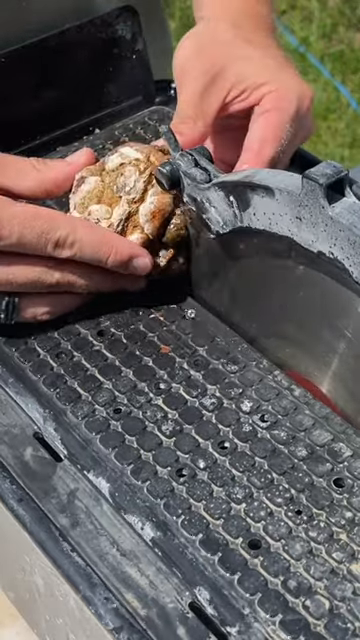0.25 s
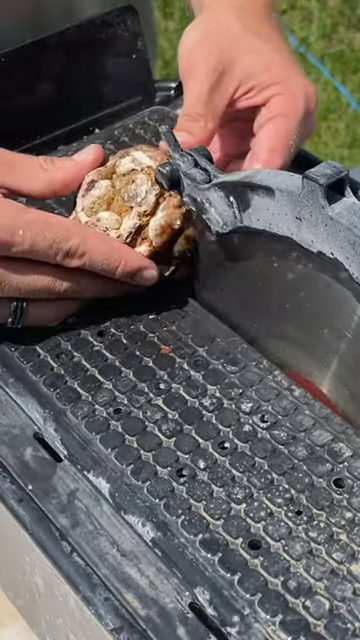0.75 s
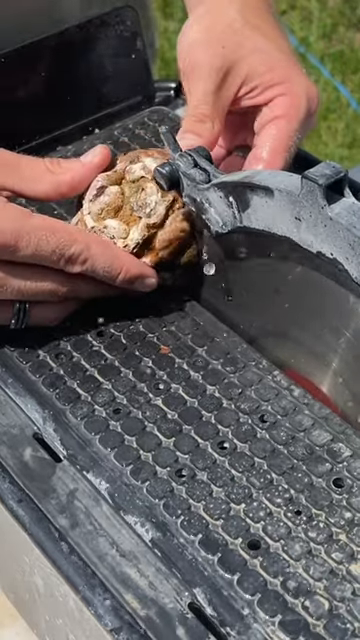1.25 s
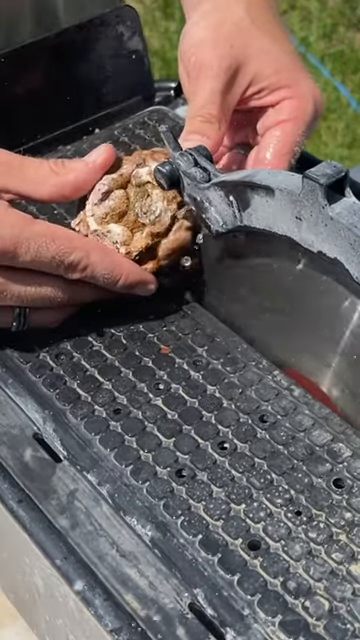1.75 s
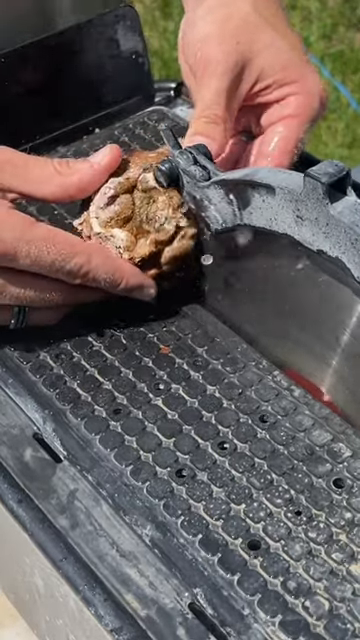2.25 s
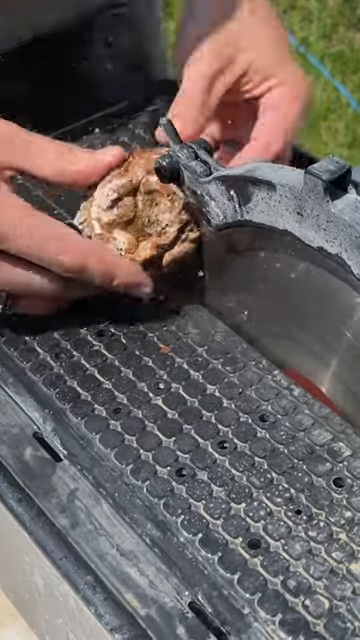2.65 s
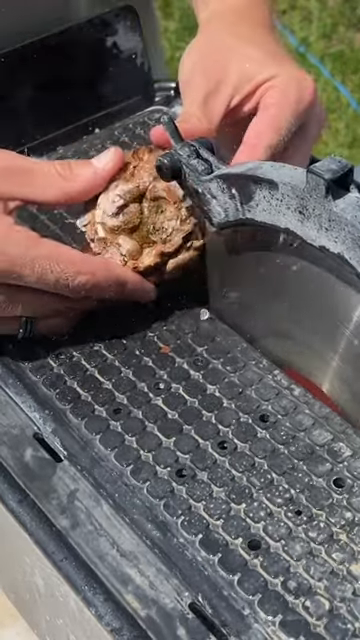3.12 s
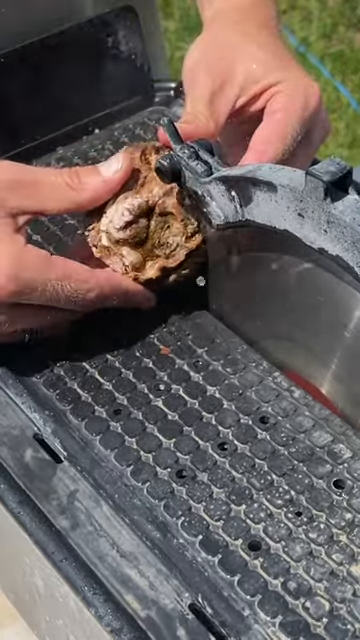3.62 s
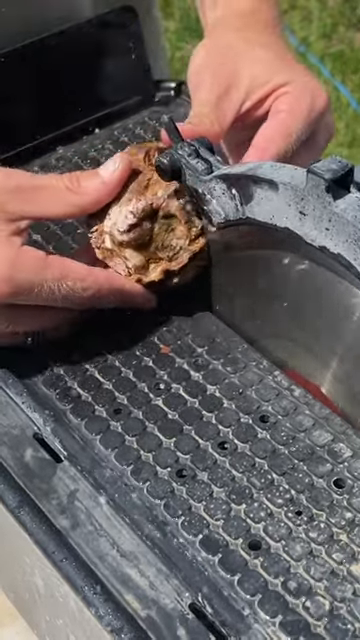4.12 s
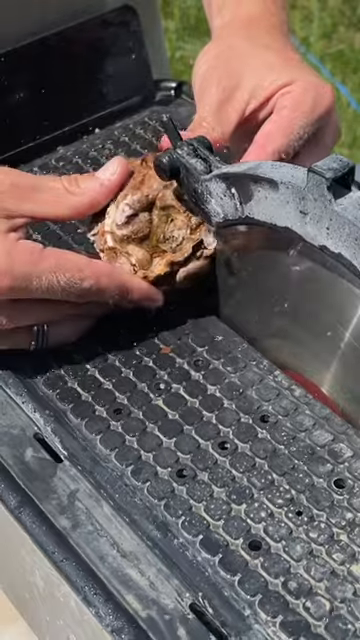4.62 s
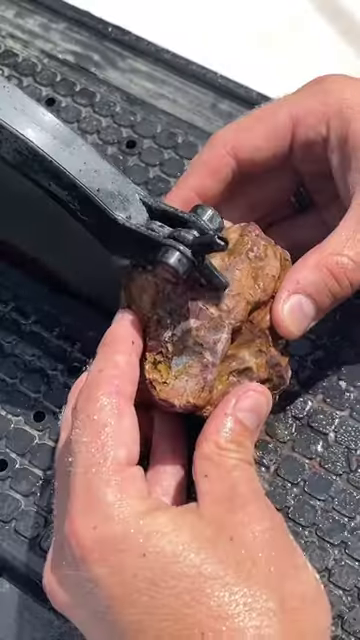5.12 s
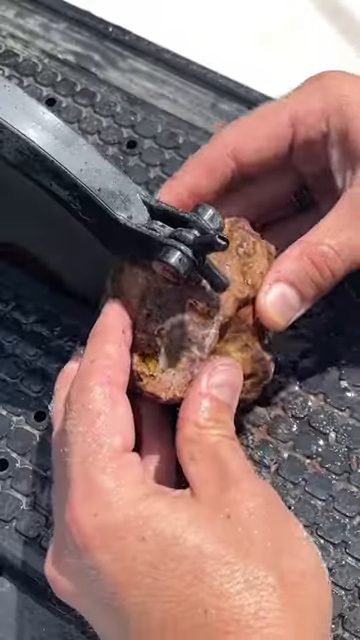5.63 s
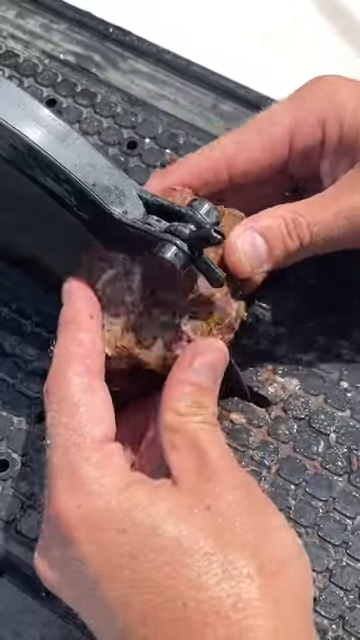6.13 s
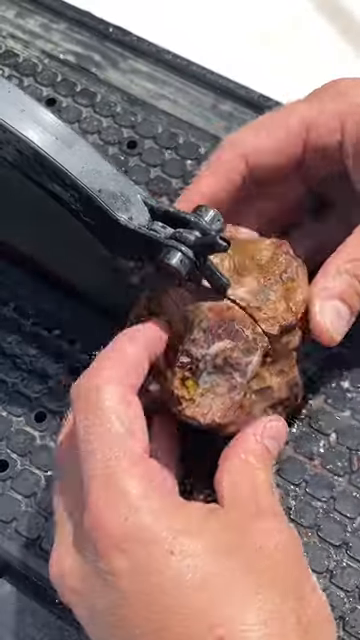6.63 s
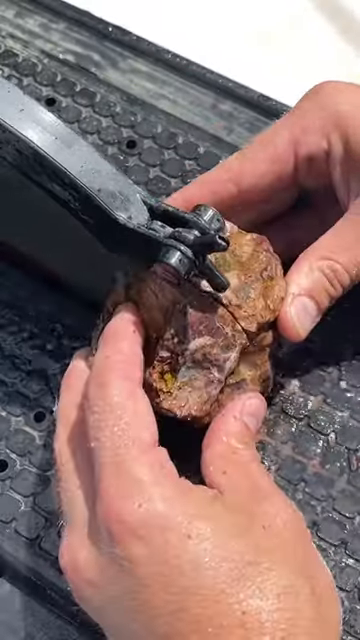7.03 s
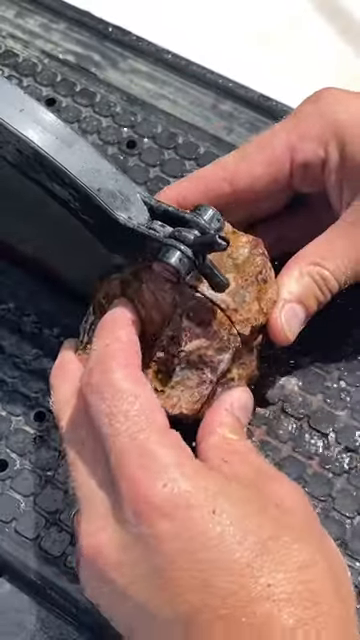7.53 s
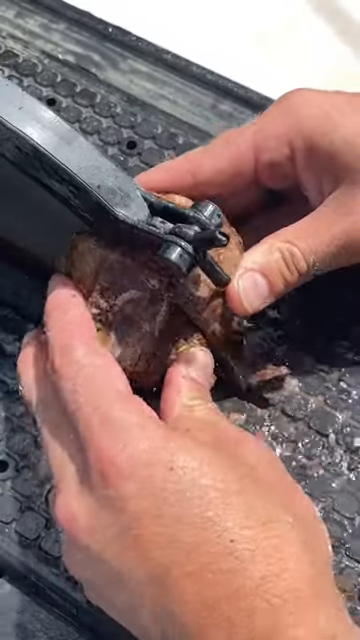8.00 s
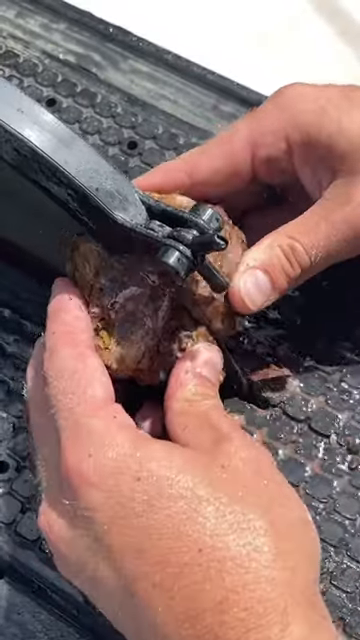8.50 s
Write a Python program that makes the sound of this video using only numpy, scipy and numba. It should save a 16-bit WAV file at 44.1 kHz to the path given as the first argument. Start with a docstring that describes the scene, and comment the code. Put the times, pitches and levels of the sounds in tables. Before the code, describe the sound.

Buzzing, gritty blade grind on rock with water-spray hiss and wind thumps, shifting in tone midway, ending in a sudden piercing screech with cracking chips.

```python
"""A wet tile saw cuts a hand-held stone outdoors, picked up from two places in turn, then very close.
The rim meets the stone the same way each turn, so the grind is a comb of the turn rate; fresh grit
replaces part of that pattern whenever the stone is shifted. The close cut is a loud, throbbing scream
of grit-driven blade resonances with cracking chips. Fan and spray hiss as filtered noise, with a thin
motor tone at the first place; wind buffets the microphone as lumpy low noise and single pushes."""
import sys
import numpy as np
from scipy import signal
from scipy.fft import rfft, irfft
from scipy.io import wavfile
from scipy.ndimage import uniform_filter1d, map_coordinates
from numba import njit

SR = 44100
rng = np.random.default_rng(int(sys.argv[2]) if len(sys.argv) > 2 else 0)


def generate_wav(signal):
    """Clip the signal to [-1, 1] and save it as 16-bit WAV at the path in sys.argv[1]."""
    frames = np.transpose(np.atleast_2d(signal))
    scaled = np.clip(frames, -1, 1) * 32767
    pcm = np.round(scaled).astype(np.int16)
    wavfile.write(sys.argv[1], SR, pcm)


def voltage_ratio(level):
    """Linear amplitude factor for a level in decibels (scalar or array-like)."""
    return 10 ** (np.asarray(level, float) / 20)


N = 386316

MOVE_S, CLOSE_S = 4.84, 8.29   # the second place begins; the close cut begins
# how restlessly the stone sits on the rim: t/s, scale for the ring, scale for the grind
RESTLESSNESS = [(0.0, .8, .9), (.35, .35, 1), (1.25, .35, 1), (1.4, .35, .7), (2.2, .35, .7), (2.4, .8, .9),
                (2.68, .8, .9), (2.72, .3, .5), (2.84, .3, .5), (2.9, .8, .9), (3.2, .6, .55),
                (4.05, .6, .45), (4.2, .9, .6), (4.83, 1, .5), (5.1, 1, .8), (6.2, 1.1, .9), (6.3, .5, .6),
                (6.8, .5, .6), (7.6, .5, .7), (7.7, 1, 1), (8.28, 1, 1)]


def in_time(rows):
    """Table columns as curves, one value a sample."""
    s, *columns = np.transpose(rows)
    return [np.interp(np.arange(N) / SR, s, c) for c in columns]


def spells(rows, rise_s, fall_s):
    """Rows of (start, length, size) as one curve of flat-topped humps; the edges straddle start and end."""
    t = np.arange(0, N + 32, 32) / SR
    out = np.zeros(len(t))
    for start, length, size in rows:
        rise = np.clip((t - start) / rise_s + .5, 0, 1)
        fall = np.clip((start + length - t) / fall_s + .5, 0, 1)
        out += size * rise * fall
    return np.interp(np.arange(N) / SR, t, out)


def rms_one(x):
    """Scale to unit rms."""
    return x / np.sqrt(np.mean(x ** 2) + 1e-20)


def coloured(x, points):
    """Filter by a (Hz, dB) spectrum, joined up along log frequency."""
    hz = np.maximum(np.fft.rfftfreq(N, 1 / SR), 1)
    hz_at, db = np.transpose(points)
    return irfft(rfft(x) * voltage_ratio(np.interp(np.log(hz), np.log(hz_at), db)), N)


def band(x, low_hz, high_hz):
    """Steep band-pass."""
    return signal.sosfilt(signal.butter(4, [low_hz, high_hz], "band", fs=SR, output="sos"), x)


def evened(x, over_s):
    """Divide out the slow level."""
    return x / np.sqrt(uniform_filter1d(x ** 2, int(over_s * SR)) + 1e-20)


def drift(shape, rate):
    """Slow chance along the last axis, rate in cycles per step; rms 1."""
    r = np.exp(-2 * np.pi * rate)
    noise = rng.standard_normal((shape[0], shape[1] + 500))
    return rms_one(signal.lfilter([1], [1, -2 * r, r * r], noise)[:, 500:])


def blend(share, pattern, grit):
    """Mix two sources by power share."""
    return np.sqrt(share) * pattern + np.sqrt(1 - share) * grit


def resonance(x, hz, width_hz):
    """Two-pole resonance, gain 1 on top."""
    r = np.exp(-np.pi * max(width_hz, 5) / SR)
    return signal.lfilter([(1 - r * r) / 2, 0, (r * r - 1) / 2], [1, -2 * r * np.cos(2 * np.pi * hz / SR), r * r], x)


@njit
def moving_resonance(x, hz, r, sr):
    """Two-pole resonance whose centre follows a curve; r is the pole radius."""
    y = np.zeros(len(x))
    for i in range(2, len(x)):
        driven = (1 - r * r) / 2 * (x[i] - x[i - 2])
        y[i] = driven + 2 * r * np.cos(2 * np.pi * hz[i] / sr) * y[i - 1] - r * r * y[i - 2]
    return y


def motor():
    """Fan and spray as steady filtered noise throughout, and a thin steady sine at the first place."""
    # motor tone: f/Hz, level/dB rms
    tone_rows = [(1034, -69.5)]
    # spectrum of fan and spray: f/Hz, relative level/dB per Hz
    fan_colour = [(60, -13), (150, 9.5), (400, 4), (750, 10), (1000, 11), (2000, 11), (3300, -3),
                  (8000, 14), (15600, -39)]
    t = np.arange(N) / SR
    tone = sum(voltage_ratio(db) * np.sqrt(2) * np.sin(2 * np.pi * hz * t) for hz, db in tone_rows)
    fan = rms_one(coloured(rng.standard_normal(N), fan_colour))
    return voltage_ratio(-66) * fan + tone * (t < MOVE_S)


def wind():
    """Lumpy low pressure noise on the microphone port; strong gusts reach higher."""
    # wind strength: t/s, level/dB
    strength = [(0.0, -62), (0.8, -48), (1.1, -56), (1.32, -42.5), (2.0, -37.5), (2.7, -47), (2.95, -50),
                (3.1, -77), (3.5, -55), (3.76, -63), (3.9, -44.5), (4.55, -46), (4.83, -53.5), (4.88, -73),
                (5.15, -71), (5.5, -56), (5.65, -47), (5.86, -64.5), (6.1, -55.5), (6.44, -63), (6.56, -42),
                (6.9, -48.5), (7.05, -61), (7.3, -71), (7.9, -69), (8.2, -50.5), (8.32, -58), (8.76, -44)]
    # wind spectrum: f/Hz, relative level/dB per Hz
    wind_colour = [(20, 2.5), (40, -7.5), (80, -12.5), (110, -16.5), (160, -16.5), (320, -39), (700, -49.5),
                   (1500, -50)]
    # single buffets on the port: t/s, size/dB over the wind, before the scaling and offset below
    buffets = [(.02, 12), (.41, 4), (.56, 4), (.86, 14), (1.315, 9), (1.36, 8), (1.51, 8), (1.55, -2),
               (1.765, 4), (1.79, 5), (1.825, 6), (2.043, 9.5), (2.27, 8), (2.48, 7), (2.545, 9),
               (2.665, 14), (2.73, 15.5), (4.051, 6.5), (4.22, 8), (4.53, 11), (4.75, 4), (4.82, 11),
               (5.03, 16), (5.561, 14), (6.59, 3), (7.64, 14)]
    buffet_s, push_s = 0.015, 0.0057   # Gaussian spreads
    t = np.arange(N) / SR
    steps = N // 100 + 1
    lumps = np.interp(np.arange(N) / 100, np.arange(steps), voltage_ratio(1.65 * drift((1, steps), 0.031)[0]))
    colour = [(4.3, -62)] + wind_colour + [(4000, -81)]
    gusts = evened(coloured(rng.standard_normal(N) * lumps, colour), 0.28)
    steady_db = in_time(strength)[0]
    wind_db = steady_db + sum(0.74 * db * np.exp(-.5 * ((t - s) / buffet_s) ** 2) for s, db in buffets)
    # each buffet also pushes the diaphragm once: in, then out
    pushes = sum(voltage_ratio(db) * (t - s) / push_s * np.exp(-.5 * ((t - s) / push_s) ** 2) for s, db in buffets)
    # the upper part of the gusts grows faster than the wind itself
    upper = voltage_ratio(0.062 * (wind_db + 9.0)) * band(gusts, 154.0, 2400)
    return voltage_ratio(steady_db + 2.5) * pushes + voltage_ratio(wind_db) * (0.83 * gusts + upper)


def close_cut():
    """Grit drives the blade resonances; every bite swells the scream and knocks the table."""
    # one throb per bite of the rim: t/s, scream level/dB rms, knock level/dB
    bites = np.array([(8.305, -31.5, -60), (8.3192, -33, -66), (8.3513, -25, -68), (8.381, -26, -63),
                      (8.413, -25, -38), (8.434, -40, -36), (8.451, -24.5, -45), (8.487, -25.5, -40),
                      (8.5223, -28, -35.5), (8.5538, -26.5, -30.5), (8.5856, -26, -53), (8.6, -28, -46),
                      (8.619, -25, -39), (8.633, -28, -53), (8.66, -29.5, -40), (8.6976, -25.5, -35),
                      (8.732, -26, -42)])
    # between bites: t/s, scream level/dB, upper over lower scream/dB, hiss level/dB, rumble level/dB,
    # lower scream f/Hz, upper scream f/Hz
    between = [(8.3, -30.5, -5, -44.5, -39, 4260, 5300), (8.35, -32, 1.5, -40, -38.5, 4270, 5300),
               (8.42, -37, -4, -44.5, -38.5, 4150, 5550), (8.47, -38.5, -7, -44, -40, 3460, 5450),
               (8.54, -37, 1, -40, -41, 3560, 5600), (8.58, -34.5, -5, -43, -45, 4000, 5700),
               (8.62, -31, -1.5, -42.5, -41.5, 4050, 5700), (8.69, -30.5, 1.5, -38, -42, 4320, 5870),
               (8.76, -28.5, 4.5, -35.5, -37.5, 4400, 5900)]
    # spectrum of the close grit: f/Hz, relative level/dB per Hz
    grit_colour = [(59, -47), (100, -17), (220, -7), (320, -20.5), (531, -16), (944, -11.5), (1710, -15),
                   (2870, 0), (3730, 13.5), (4070, 7), (5770, 4), (6400, -17), (8320, -39), (14100, -120)]
    # spectrum of the close hiss: f/Hz, relative level/dB per Hz
    hiss_colour = [(3760, -26), (6400, -9), (6640, -6), (8500, -5), (9400, -9), (11800, -10.5), (12800, -2),
                   (14300, -7), (15600, 0)]
    # blade resonances: f/Hz, width/Hz, level/dB relative to each other
    resonances = [(2340, 120, -9), (2920, 170, 5.5), (3330, 61, 1.5), (4050, 100, 5.5), (4430, 96, 2.5),
                  (5300, 83, -3)]
    # chips cracking off the stone: t/s, level/dB relative to each other, treble within the crack/dB
    chip_rows = [(8.4487, -17, -9), (8.521, -15.5, -3), (8.555, -17, -6), (8.5859, -15, -6),
                 (8.6007, -20, -8), (8.6167, -16, -8), (8.6264, -14, -12), (8.6365, -18, -14),
                 (8.6544, -26, -11), (8.6986, -19, -6), (8.732, -19, -8), (8.7457, -15, -8)]
    chip_s = 0.0019   # decay time constant
    t = np.arange(N) / SR
    scream_db, upper_db, hiss_db, rumble_db, centre_hz, upper_hz = in_time(between)

    since = t - bites[:, :1] - .006   # each throb peaks 6 ms after its time in the table
    swell = np.exp(-.5 * (since / np.where(since < 0, .0075, .007)) ** 2)
    bite = np.sqrt(voltage_ratio(2 * bites[:, 1]) @ swell ** 2)
    knock_rise = np.clip((since + 0.0034) / 0.0057, 0, 1)
    knock = voltage_ratio(bites[:, 2]) @ (knock_rise * np.exp(-(since + 0.0055).clip(0) / 0.022))

    # uneven grain sizes roughen the noise
    grains = rng.standard_normal(N) * voltage_ratio(3.5 * np.minimum(rng.exponential(1, N), 5))
    grit = rms_one(coloured(grains, grit_colour))
    flutter = drift((len(resonances), int(200 * N / SR) + 2), 0.069)   # 200 steps a second
    rung = grit.copy()
    for (hz, width_hz, db), f in zip(resonances, flutter):
        flutter_db = 4.6 * np.interp(t * 200, np.arange(len(f)), f)
        rung += voltage_ratio(db + 10.5 + flutter_db) * resonance(grains, hz, width_hz)

    lower = evened(band(rung + 2.4 * moving_resonance(rung, centre_hz, 0.98, SR), 1980, 5000), .06)
    upper = grains + 4.5 * moving_resonance(grains, upper_hz, .984, SR)
    upper = upper + 3.5 * moving_resonance(grains, upper_hz - 330, .985, SR)
    tilt = voltage_ratio(upper_db)
    scream = (lower + tilt * evened(band(upper, 4700, 6400), .06)) / np.sqrt(1 + tilt ** 2)
    scream = np.hypot(voltage_ratio(scream_db), bite) * scream

    hiss = rms_one(band(coloured(grains, hiss_colour), 6350, 16600))
    hiss = voltage_ratio(hiss_db) * (1 + 1.1 * swell.sum(axis=0)) * hiss
    rumble = voltage_ratio(rumble_db) * rms_one(band(grit, 96, 2040))
    knocks = knock * rms_one(band(grains, 130, 425) + 0.54 * band(grains, 603, 1070))
    dull, bright = rms_one(band(grains, 2870, 5600)), rms_one(band(grains, 6300, 14000))
    chips = np.zeros(N)
    for s, db, treble_db in chip_rows:
        decay = np.exp(-(t - s).clip(0) / chip_s) * (t > s)
        chips += voltage_ratio(db - 7.5) * decay * (dull + voltage_ratio(treble_db) * bright)
    return (scream + hiss + rumble + knocks + chips) * np.clip((t - CLOSE_S) / 0.011, 0, 1)


def rim_pattern(turns, favoured, ring_boost_db, wander_db, patch_db, slip):
    """One waveform per turn, its 64 overtones wandering in strength and phase as the kerf wears."""
    # overtones that sing out or fade, one list for each singing multiple: start t/s, length/s, change/dB
    sing_lists = [
        [(0, 0.35, -4.5), (1.6, 0.43, -5), (2.8, 0.19, -4), (3.6, 0.47, -4), (4.2, .2, 3.5), (4.65, .15, 2),
         (4.86, 0.69, -1.5), (5.65, 0.097, 5), (5.8, .2, -10), (6.8, .2, -2), (7.2, 0.19, -7), (7.4, 0.17, 3)],
        [(0, 0.22, -7), (.22, 0.15, 2.5), (1.25, 1.15, 5), (2.42, 0.24, -11), (2.68, 0.21, 5), (3.2, 0.22, -4),
         (4.45, 0.074, 0), (4.54, 0.044, -6), (4.6, 0.072, 6), (4.69, .04, -8), (5.18, 0.053, 10),
         (5.25, .04, -10), (5.36, .02, -6), (5.42, .12, -11), (5.8, 0.039, 4), (6.1, 0.53, 5)],
        [(0, 0.44, 4.5), (.6, 0.45, -3), (1.25, 0.11, 5), (1.56, 0.082, 11), (2.0, 0.33, 3.5), (2.44, 0.11, 4),
         (2.86, .25, 0.5), (3.8, 0.24, 1.5), (4.03, .14, 5), (4.25, 0.165, -9), (4.55, .05, -6),
         (4.61, 0.05, 6), (5.02, 0.048, 8), (5.44, 0.036, 8), (5.5, .12, -5), (5.66, .34, 2), (6.8, 0.7, 6)],
        [(.4, 0.52, 2.5), (1.1, .13, 4), (1.25, .7, 0.5), (3.0, .15, 3), (3.6, 0.21, -8), (4.45, 0.42, -4),
         (4.86, .05, 12.5), (5.2, .13, -2), (5.31, .03, -9), (5.35, .06, 4), (5.44, .04, 9), (5.83, 0.6, 6),
         (7.42, 0.35, 5.5)],
        [(0, 0.32, -11), (.3, 2.3, 5), (3.12, 0.11, 9), (4.2, 0.19, 7), (4.62, .05, 9), (5.08, 0.25, 4.5),
         (5.6, 0.15, 5), (5.9, 0.055, 11), (6.2, 0.24, 1), (6.45, 0.15, -8), (6.8, 0.58, -4), (7.5, 0.14, 6)],
        [(1.4, .2, 5.5), (2.0, 0.41, 5.5), (2.68, 0.19, 11.5), (3.12, 0.31, 7), (4.2, 0.25, -6),
         (5.3, 0.26, 6.5), (5.8, .3, -11), (6.8, 0.53, -4)],
        [(.5, 0.54, 1.5), (3.85, .2, 5), (4.12, 0.19, 2)],
        [(.3, 0.99, 2), (1.28, .1, 4), (2.3, .12, 6), (3.1, .1, 3), (3.3, .15, 3), (4.48, 0.046, 6),
         (4.6, .08, 8), (4.76, 0.058, 9), (6.22, .2, 5), (7.25, .4, 4)],
        [(1.0, .15, 5), (3.25, .18, 7), (4.6, .08, 8), (7.4, .25, 5)],
        [(3.3, .45, 3), (4.48, .12, 7), (7.0, .3, 8)],
        [(.3, .13, 5), (1.2, .1, 7), (3.15, .2, 4), (3.78, 0.29, 10), (4.68, .1, 5)],
        [(.64, .12, 5), (.98, .2, 3.5), (1.21, .05, 6), (3.4, .65, 4.5), (4.7, .1, 4)],
    ]
    # the singing multiples of the turn rate, in the order of those lists: multiple
    multiples = np.array([5, 6, 7, 8, 9, 10, 14, 15, 16, 20, 21, 25])
    sing_edge_s = 0.024
    order = np.arange(1, 65)[:, None]
    count = int(turns[-1]) + 2

    def each_turn(curve):
        return np.interp(np.arange(count), turns, curve)

    steadier = np.clip(order / 5.6, 0, 1)   # the lowest overtones come through table and blade and hold still
    unrest = np.where(order <= 10, *[each_turn(c) for c in in_time(RESTLESSNESS)])
    slow = np.where(order <= 10, .33, .9) * np.minimum(drift((64, count), .006), 1.3)
    own = slow + 1.2 * unrest * drift((64, count), .09)
    # neighbouring overtones swell together
    patches = rms_one(uniform_filter1d(drift((64, count), 0.011), size=4, axis=0))
    patches = np.where(order <= 10, .35, .6) * patches
    # the overtone nearest the free ring stands out
    nearest = np.round(each_turn(favoured))
    sung_db = ring_boost_db * uniform_filter1d(1.0 * (order == nearest), size=5, axis=1)
    sung_db[multiples - 1] += [each_turn(spells(rows, sing_edge_s, sing_edge_s)) for rows in sing_lists]
    strength = voltage_ratio(steadier * (wander_db * own + patch_db * patches) + sung_db)

    # slow phase drift, with quick slips while the stone sits restlessly
    slips = drift((64, count), 0.011) + unrest * drift((64, count), .1)
    phase = rng.uniform(0, 2 * np.pi, (64, 1)) + slip * np.sqrt(order) * slips
    spectra = np.zeros((count, 257), complex)
    spectra[:, 1:65] = (strength * np.exp(1j * phase)).T
    waves = irfft(spectra, 512)
    waves = np.hstack([waves, waves[:, :1]])   # close the circle
    # read round the rim while fading from one turn's waveform to the next
    return rms_one(map_coordinates(waves, [turns, 512 * (turns % 1)], order=1))


def blade_modes(x, modes, flutter_db):
    """Add broad disc modes whose strengths come and go as the stone damps the disc."""
    # a mode swells or is damped while the stone presses one way: start t/s, length/s, near f/Hz, change/dB
    presses = np.array([(.3, 0.98, 3650, 5), (.4, 0.56, 6800, 7), (.5, 0.76, 4400, 12), (.7, 0.55, 7450, 7),
                        (.9, 0.42, 12400, 2), (1.203, .7, 13200, 8), (1.5, 0.76, 8200, 4),
                        (1.504, 1, 10750, 5.5), (2.253, 0.18, 3650, 0), (2.9, 0.16, 3650, 3),
                        (3.0, 0.35, 7450, 2), (3.1, 0.55, 9700, 5), (3.2, 0.34, 10750, 3),
                        (3.308, .75, 12400, 0), (3.4, 0.7, 4950, 4), (3.5, 0.33, 6050, 11),
                        (3.55, 0.22, 6800, 11), (3.75, 0.23, 8200, 5), (3.2, 1.7, 3650, -3),
                        (4.59, 0.089, 3650, 5), (5.054, 0.25, 6150, 10.5), (5.05, .3, 7150, 3),
                        (5.1, 0.22, 5000, 4), (5.45, 0.23, 6150, 6), (6.25, 0.18, 7150, 7),
                        (6.3, .2, 13500, 3), (6.997, 0.23, 6150, 12), (7.0, 0.54, 8000, 3),
                        (7.303, 0.52, 7150, 6), (7.7, .15, 7150, 1)])
    edge_s = 0.033
    steps = np.arange(N) / 400
    flutter = flutter_db * drift((len(modes), N // 400 + 2), 0.045)
    nearest = np.abs(presses[:, 2:3] - np.array(modes)[:, 0]).argmin(axis=1)
    out = x.copy()
    for k, (hz, width_hz, db) in enumerate(modes):
        pressed_db = spells(presses[nearest == k][:, [0, 1, 3]], edge_s, edge_s)
        mode_db = db + np.interp(steps, np.arange(len(flutter[k])), flutter[k]) + pressed_db
        out += voltage_ratio(mode_db) * resonance(x, hz, width_hz)
    return out


def cutting():
    """Repeating rim and fresh grit share each range; the stone and blade colour both."""
    # blade speed, sagging under load, one list for each place: t/s, speed/turns per s
    speed_rows = [
        [(0.0, 247.7), (0.07, 249.6), (0.29, 246.6), (0.32, 244.4), (0.42, 245.1), (0.55, 242.6), (0.75, 242.9),
         (0.81, 241.0), (0.89, 242.1), (0.93, 241.0), (1.14, 243.3), (1.2, 241.0), (1.26, 244.3), (1.43, 246.3),
         (1.79, 242.6), (1.92, 245.3), (2.12, 243.9), (2.18, 242.0), (2.23, 245.8), (2.34, 239.5),
         (2.46, 248.2), (2.56, 249.6), (2.6, 247.0), (2.64, 249.6), (2.66, 248.6), (2.77, 234.9), (2.81, 238.4),
         (2.84, 237.5), (2.91, 249.0), (3.08, 242.2), (3.15, 246.0), (3.25, 242.2), (3.42, 241.2),
         (3.47, 242.6), (3.54, 239.8), (3.73, 239.8), (3.82, 237.6), (3.87, 240.3), (3.91, 240.3),
         (4.01, 238.0), (4.08, 240.1), (4.13, 246.4), (4.24, 238.5), (4.32, 239.7), (4.45, 234.7),
         (4.49, 244.3), (4.59, 238.9), (4.65, 239.4), (4.69, 244.2), (4.72, 244.9), (4.79, 240.6),
         (4.83, 240.5)],
        [(4.85, 260.8), (4.9, 261.2), (4.93, 269.6), (5.01, 270.5), (5.08, 262.1), (5.14, 264.3), (5.2, 260.4),
         (5.33, 258.7), (5.38, 262.7), (5.57, 259.1), (5.62, 255.8), (5.67, 258.4), (5.7, 256.6), (5.8, 261.7),
         (5.84, 259.5), (5.89, 262.6), (5.94, 260.7), (6.01, 267.2), (6.06, 269.5), (6.09, 261.7),
         (6.16, 265.7), (6.31, 256.5), (6.41, 255.9), (6.46, 264.7), (6.58, 262.2), (6.6, 267.9), (6.66, 272.2),
         (6.89, 264.7), (6.95, 265.8), (7.2, 262.3), (7.36, 266.2), (7.48, 264.0), (7.62, 267.2), (7.66, 266.5),
         (7.7, 271.4), (7.72, 264.5), (7.78, 263.2), (7.83, 264.7), (7.86, 269.4), (8.28, 270.1)],
    ]
    # slow course of the cut, before lifts and surges: t/s, ring level/dB, ring f/Hz,
    # grind level/dB, treble grit level/dB
    contact = [(0.0, -40.5, 1720, -52.5, -50), (0.35, -39.5, 1690, -48, -48), (0.5, -45, 2050, -46, -46),
               (1.25, -46.5, 1860, -47, -45.5), (1.45, -43, 1510, -50.5, -49),
               (1.6, -43, 1680, -48.5, -47.5), (1.87, -42.5, 1450, -50, -49),
               (2.4, -42, 1580, -47.5, -48.5), (2.66, -44, 1910, -50, -50.5),
               (2.74, -42, 2510, -46.5, -45.5), (2.86, -43, 1680, -49.5, -48.5),
               (3.12, -45, 2100, -45.5, -45), (3.3, -50.5, 2140, -47, -47), (3.65, -50.5, 1640, -50, -45.5),
               (4.1, -45.5, 1660, -50, -46), (4.45, -47.5, 1790, -50.5, -47), (4.83, -49, 1650, -45.5, -44),
               (4.86, -46, 2130, -49.5, -49.5), (5.04, -41, 1880, -49, -46.5),
               (5.12, -46.5, 2000, -47, -44.5), (5.6, -48, 1860, -48, -48), (5.95, -42, 2120, -50, -48.5),
               (6.1, -43, 2100, -50.5, -50.5), (6.4, -46.5, 1600, -47.5, -44.5),
               (6.56, -43.5, 1850, -51.5, -49.5), (6.9, -46, 1850, -50, -48.5), (7.1, -43, 1840, -51, -45),
               (7.51, -42.5, 1910, -48, -45), (7.66, -48, 2110, -50, -50.5), (7.82, -50, 1640, -49.5, -47),
               (8.28, -47.5, 1640, -59, -43)]
    # finest grit, before lifts and surges: t/s, level/dB
    finest = [(0.0, -51), (1.3, -50), (2.0, -50.5), (2.7, -50.5), (3.25, -47.5), (4.0, -50), (4.83, -51),
              (4.86, -53), (5.3, -52.5), (5.9, -52.5), (6.1, -55), (6.38, -50.5), (6.9, -49.5), (7.5, -55),
              (7.8, -53.5), (8.0, -49), (8.1, -45), (8.28, -47)]
    # table vibration, before lifts, surges and wavers: t/s, hum at the turn rate/dB, drone level/dB,
    # second, third and fourth multiple within the drone/dB
    table_rows = [(0.0, -54, -58, 18, -1, -8), (0.19, -55.5, -51.5, 0, -10, 9),
                  (0.27, -54, -64.5, 2, -10, 6), (0.9, -53.5, -59.5, 2, -3, -6),
                  (1.33, -56, -59, 1, -5, -3), (2.26, -53, -61.5, -0.5, -7, -3.5),
                  (2.6, -55, -54, 0.5, -13, -15), (3.43, -52.5, -57.5, 1, -1.5, -1.5),
                  (4.83, -52.5, -54.5, -0.5, -0.5, -12), (4.86, -61, -53.5, -5.5, -7, -12),
                  (5.37, -59.5, -51, -3, -0.5, -1.5), (6.06, -57, -55, -5.5, -9.5, 2),
                  (6.4, -52, -56.5, 0, 1, 2), (6.56, -57, -58.5, -6, -8, -2),
                  (6.79, -67, -53.5, -2.5, 0.5, 1), (7.35, -60.5, -51.5, -3.5, -0.5, 2),
                  (7.74, -64.5, -54.5, -0.5, -1.5, 2), (8.27, -62, -58.5, -4, 5, 5)]
    # grind spectrum at the first place: f/Hz, relative level/dB per Hz
    first_colour = [(240, -43), (400, 10), (727, 3), (822, 2), (1000, -7), (1240, -2), (1490, 1),
                    (1910, -1.5), (2260, -4), (2800, -12), (3580, -12), (4370, -12), (4940, -16),
                    (8070, -16.5), (12500, -30.5), (15800, -33)]
    # grind spectrum at the second place: f/Hz, relative level/dB per Hz
    second_colour = [(240, -2), (400, -8), (1070, -13), (1320, -0.5), (1880, 2.5), (2400, -5.5),
                     (2640, -13.5), (2980, -14), (3320, -26.5), (3870, -17.5), (5420, -16), (6310, -13.5),
                     (7470, -9.5), (12500, -25), (15800, -27)]
    # grit against rim, strongest where it shakes the free disc modes, one list a place: f/Hz, level/dB
    grit_tilt = [
        [(400, -10), (1150, -9), (1500, -1), (2300, -2), (3100, -7), (3450, -3), (3750, 2), (4100, -3),
         (4500, -3), (5000, 2), (5600, 0), (6050, 3), (7000, 0), (12000, 1), (15600, 6)],
        [(400, -10), (1200, -8), (1600, 0), (2100, 1), (2700, -4), (3400, 1), (4000, 2), (4500, -2), (5200, 1),
         (7000, 0), (12000, 1), (15600, 6)],
    ]
    # disc modes set ringing, first place: f/Hz, width/Hz, mean level over the plain grind/dB
    first_modes = [(3650, 370, 7), (4400, 650, -9.5), (4950, 350, 3.5), (6050, 96, -1.5), (6800, 160, 2),
                   (7450, 560, 4.5), (8200, 420, 4), (9700, 590, -3.5), (10750, 320, 2), (12400, 360, 5),
                   (13200, 300, 3), (14900, 400, 2)]
    # disc modes set ringing, second place: f/Hz, width/Hz, mean level over the plain grind/dB
    second_modes = [(3990, 260, 2.7), (5000, 570, 2), (6150, 360, 3.7), (7150, 240, 7.9), (8000, 740, 4.2),
                    (8960, 460, 4.4), (11700, 500, 3), (13500, 560, 4.6)]
    # the stone leaves the rim: start t/s, length/s, drop/dB before the shares below
    lifts = [(2.49, 0.083, 3.5), (2.615, 0.024, 3), (2.89, 0.013, 5), (4.912, 0.09, 7.5), (5.36, 0.028, 2),
             (5.998, 0.062, 8.5), (6.588, 0.14, 8.5), (7.855, 0.13, 2), (8.025, 0.26, 7)]
    # share of that drop felt by drone, ring, grind, fine and finest grit: factor
    lift_shares = [1.33, 1.3, 1.64, 1.23, 0.73]
    # the stone is shifted and the kerf cut anew: start t/s, length/s,
    # loss of the repeating pattern in ring and in grind (0-1, before the powers below)
    shifts = np.array([(0.0, .31, .16, .42), (1.18, .08, .06, .14), (1.48, .24, .12, .22),
                       (2.18, .05, .02, .2), (2.41, .08, .45, .5), (2.49, .09, .25, .3),
                       (2.58, .11, .45, .5), (2.69, .16, 0, .1), (2.86, .07, .5, .6), (2.93, .2, .3, .42),
                       (4.06, .16, .08, .28), (4.43, .07, .15, .35), (4.66, .06, .09, .15),
                       (4.82, .09, .22, .28), (4.91, .11, .55, .55), (5.02, .05, .08, .25),
                       (5.43, .09, .4, .3), (5.52, .08, .15, .1), (5.6, .09, .36, .22),
                       (5.69, .15, .12, .2), (5.84, .05, .3, .42), (5.89, .1, .08, .28),
                       (6.0, .23, .36, .52), (6.23, .06, .1, .28), (6.44, .2, .52, .62),
                       (6.64, .14, .2, .48), (7.65, .09, .7, .58), (7.74, .28, .45, .4),
                       (8.02, .14, .3, .7), (8.16, .13, .25, .6)])
    shift_edge_s, lift_off_s, land_s = .025, 0.006, 0.022
    t = np.arange(N) / SR
    second = t > MOVE_S

    steps = N // 200 + 2
    unsteady = np.interp(np.arange(N) / 200, np.arange(steps), drift((1, steps), .045)[0])
    speed = in_time(np.vstack(speed_rows))[0] + .45 * unsteady   # turns per s
    turns = np.cumsum(speed) / SR
    count = int(turns[-1]) + 2

    def along_turns(values):
        return np.interp(turns, np.arange(count), values)

    ring_db, ring_hz, grind_db, fine_db = in_time(contact)
    finest_db, = in_time(finest)
    hum_db, drone_db, *table_db = in_time(table_rows)
    ring_lost = spells(shifts[:, [0, 1, 2]], shift_edge_s, shift_edge_s)
    grind_lost = spells(shifts[:, [0, 1, 3]], shift_edge_s, shift_edge_s)
    ring_share = np.clip(.96 - ring_lost, 0, 1)
    grind_share = np.clip(.99 - .2 * in_time(RESTLESSNESS)[1] - grind_lost, 0, 1)
    lifted_db = -np.outer(lift_shares, spells(lifts, lift_off_s, land_s))

    def placed(x):
        """Colour of the grind at each place."""
        return np.where(second, rms_one(coloured(x, second_colour)), rms_one(coloured(x, first_colour)))

    fresh = rng.standard_normal(N)
    rim = placed(rim_pattern(turns, ring_hz / speed, ring_boost_db=2.0, wander_db=3.0, patch_db=2.6, slip=.09))
    grit = placed(np.where(second, coloured(fresh, grit_tilt[1]), coloured(fresh, grit_tilt[0])))
    # grit is thrown off once a turn, so it pulses with the rim
    grit = grit * (1 + 0.63 * np.cos(2 * np.pi * turns))

    # each multiple wavers on its own as the hands damp the table
    table_db = [db + 2.0 * along_turns(f) for db, f in zip(table_db, drift((3, count), 0.03))]
    drone = sum(voltage_ratio(db) * np.sin(2 * np.pi * k * turns + k * k) for k, db in zip((2, 3, 4), table_db))
    drone = blend(ring_share ** .08, evened(drone, 0.093), evened(band(grit, 394, 1040), 0.2))
    ring = blend(ring_share ** .75, rim, grit)
    grind = blend(grind_share ** .34, rim, grit)
    grind = np.where(second, blade_modes(grind, second_modes, 1.9), blade_modes(grind, first_modes, 2.1))

    # the hand-held stone chatters against the rim, and each range surges a little as the grip varies
    chatter_db = 0.51 * along_turns(drift((1, count), 0.057)[0])
    surge_sizes_db = [1.58, 1.2, 1.6, 0.72, 0.58]   # drone, ring, grind, fine and finest grit
    surge_db = [size_db * along_turns(f) for size_db, f in zip(surge_sizes_db, drift((5, count), 0.028))]
    drone_db = drone_db + lifted_db[0] + surge_db[0]
    hum_db = hum_db + 0.34 * (lifted_db[0] + surge_db[0])   # the hum sags when contact breaks
    out = voltage_ratio(hum_db) * np.sin(2 * np.pi * turns) + voltage_ratio(drone_db) * drone
    ranges = [(ring_db, ring, 1150, 2700), (grind_db, grind, 2700, 6000),
              (fine_db, grind, 6000, 10500), (finest_db, grind, 10500, 18000)]
    for (db, source, low_hz, high_hz), lift_db, grip_db in zip(ranges, lifted_db[1:], surge_db[1:]):
        out += voltage_ratio(db + lift_db + grip_db + chatter_db) * evened(band(source, low_hz, high_hz), 0.079)
    return out * (t < CLOSE_S)


def scene():
    """One microphone feeds both channels."""
    return np.tile(motor() + wind() + close_cut() + cutting(), (2, 1))


def low_pass(x):
    """Butterworth low-pass at 17.1 kHz, gentler than the elliptic one applied before it."""
    return signal.sosfilt(signal.butter(12, 17110, fs=SR, output="sos"), x)


def record(dry):
    """A steep elliptic low-pass cuts the top."""
    steep = signal.ellip(14, .5, 85, 15780, fs=SR, output="sos")   # order, ripple dB, stop dB, cutoff Hz
    return low_pass(signal.sosfilt(steep, dry))


dry = scene()
out = record(dry)
generate_wav(out)
```